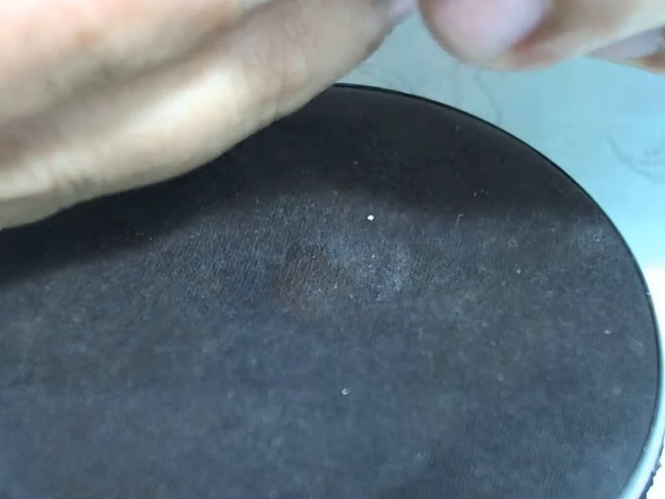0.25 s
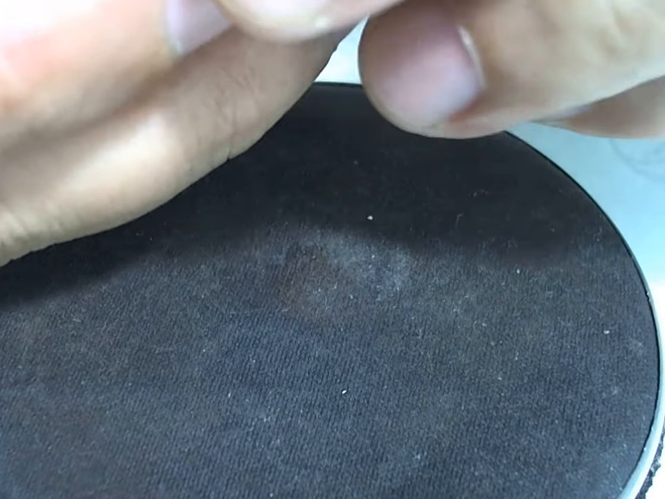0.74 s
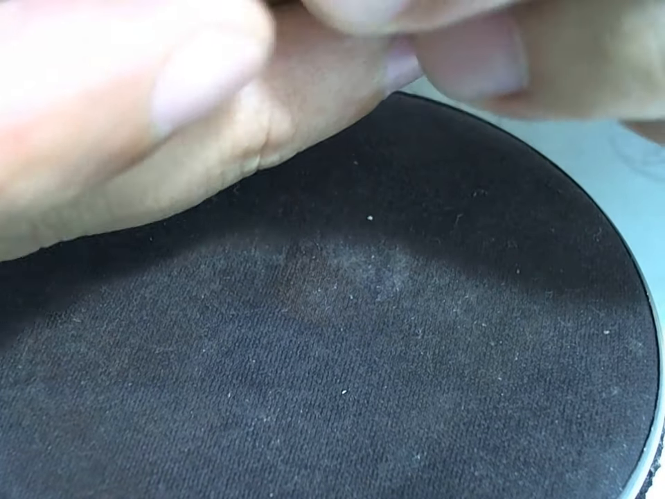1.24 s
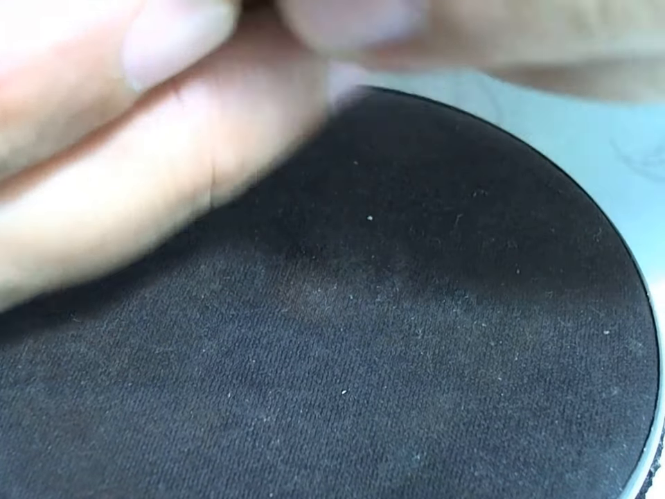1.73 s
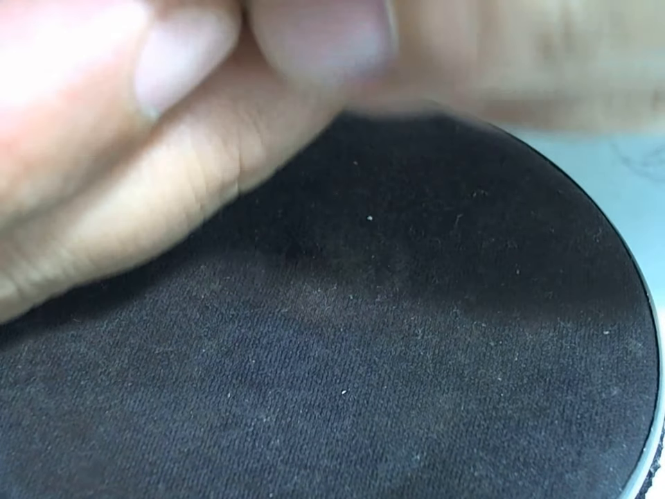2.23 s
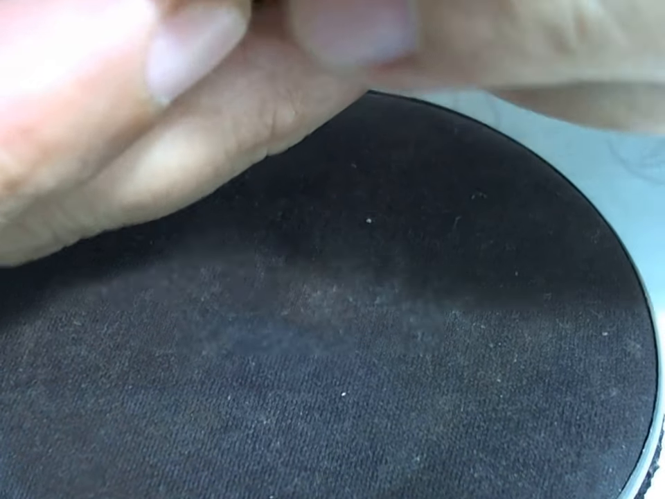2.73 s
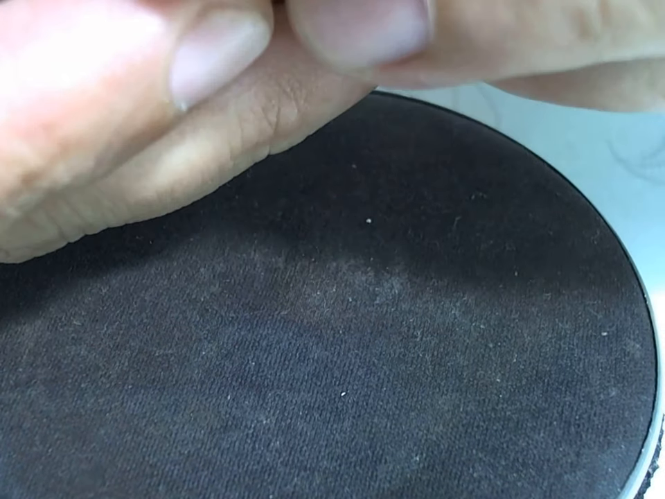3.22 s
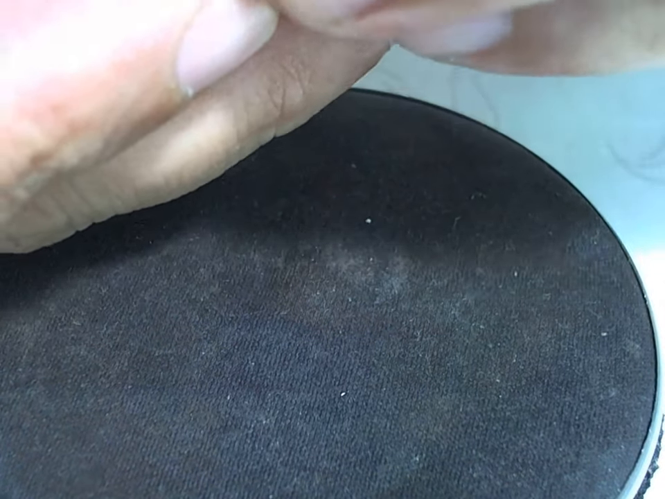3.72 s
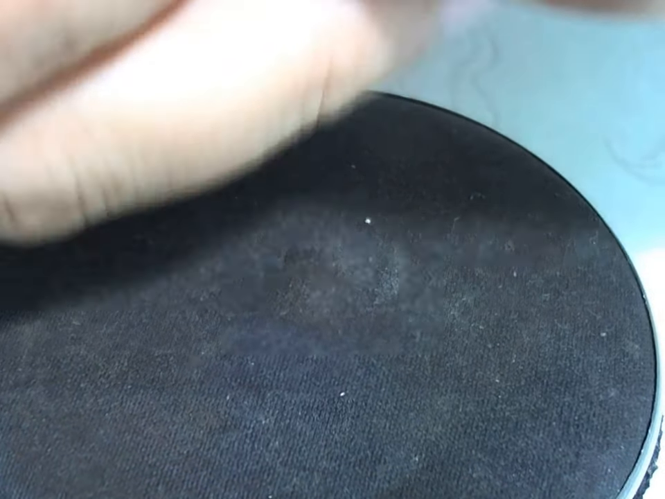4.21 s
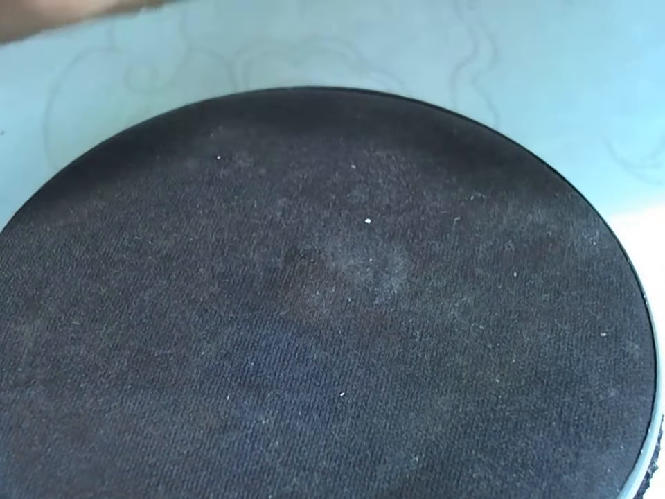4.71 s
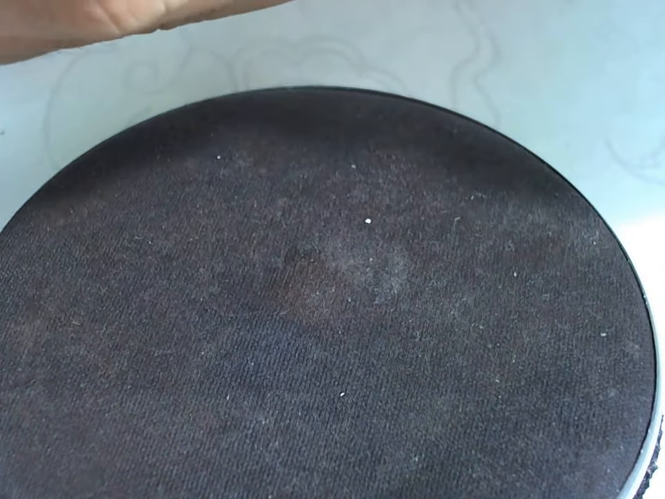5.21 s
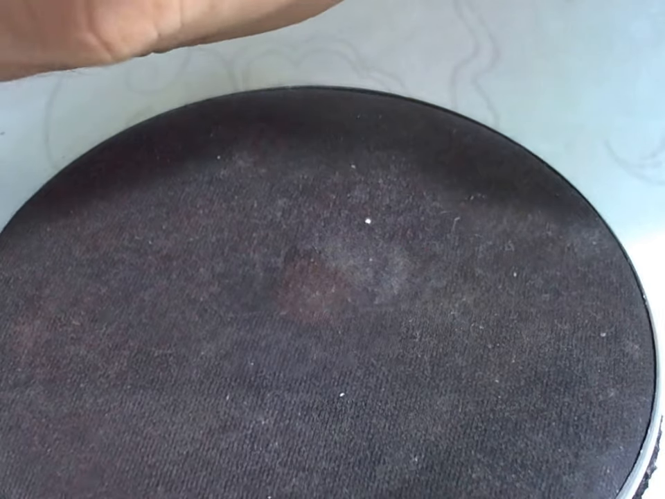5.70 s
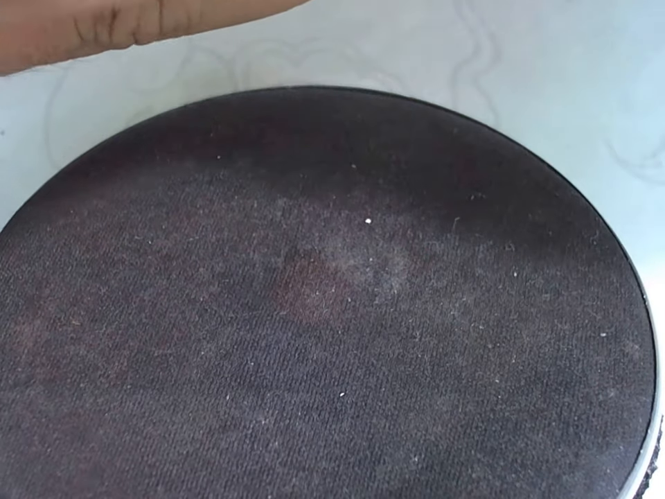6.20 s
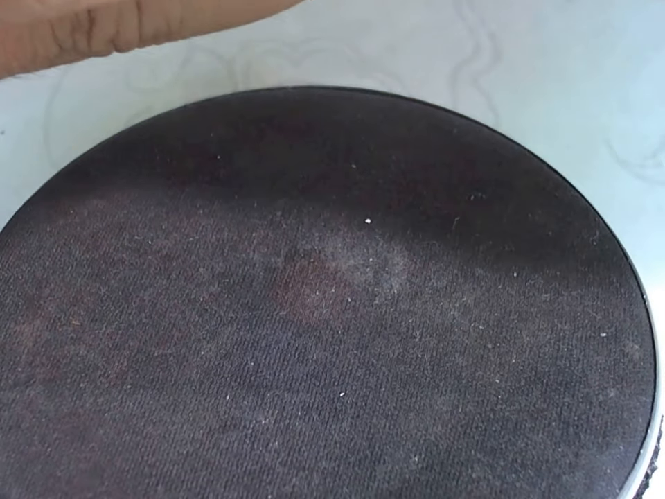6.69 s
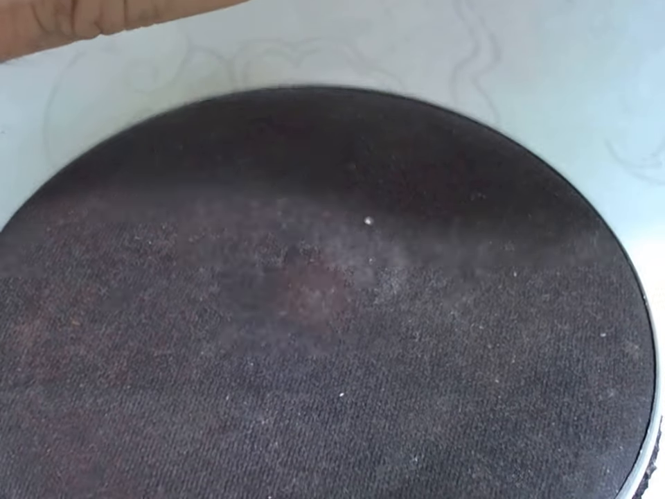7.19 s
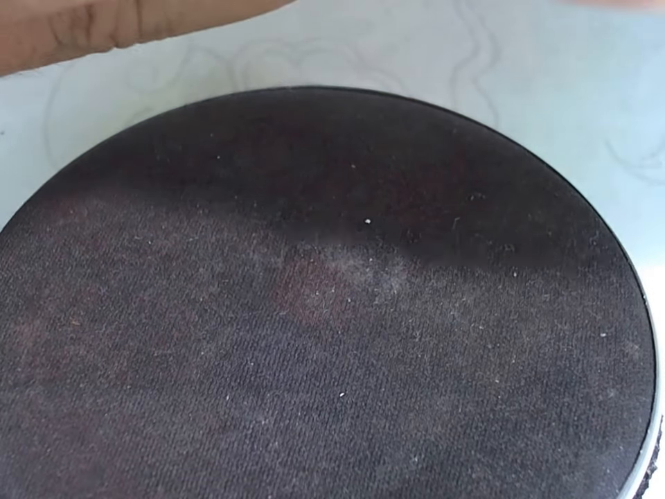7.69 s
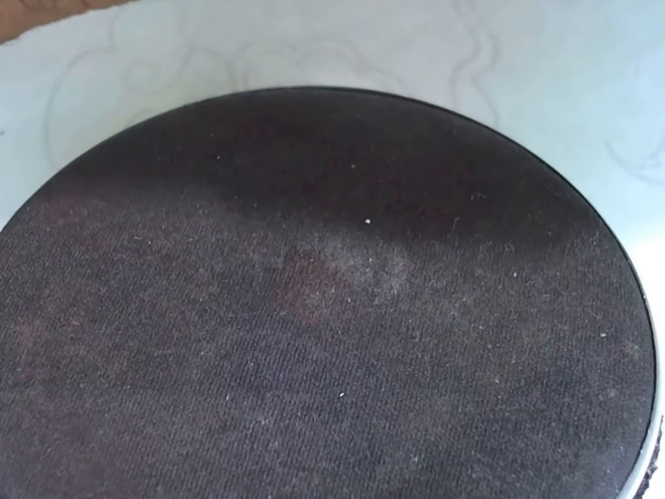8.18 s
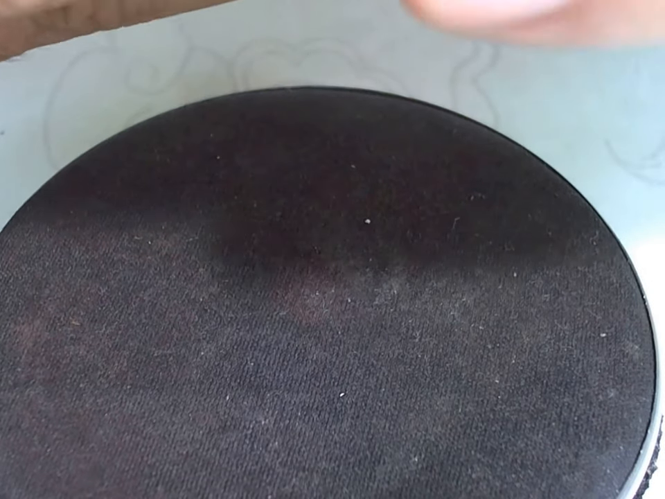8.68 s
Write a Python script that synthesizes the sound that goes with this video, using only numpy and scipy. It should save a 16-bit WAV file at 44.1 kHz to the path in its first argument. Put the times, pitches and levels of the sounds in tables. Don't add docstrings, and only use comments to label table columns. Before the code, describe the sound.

Fingertips and nails tap and click in quick irregular bursts on a small hollow object over a cloth pad, with faint hum and hiss.

```python
import sys
import numpy as np
from scipy import signal
from scipy.fft import rfft, irfft
from scipy.io import wavfile
from scipy.ndimage import uniform_filter1d

SR = 44100
rng = np.random.default_rng(int(sys.argv[2]) if len(sys.argv) > 2 else 0)


def linear_from_db(decibels):
    return 10 ** (np.asarray(decibels, float) / 20)


def put_to_file(sound):
    columns = np.atleast_2d(sound).T
    safe = np.clip(columns, -1, 1)
    whole_steps = np.round(safe * 32767)
    wavfile.write(sys.argv[1], SR, whole_steps.astype(np.int16))


N = 394694
GRAIN = 8192
HOP, HOP_START = 512, 288
CAMERA_SR, CAMERA_TOP_HZ = 32000, 9950

# [f/Hz, density level/dB]
FAN_HISS = [(30, -70), (60, -43), (110, -9), (220, -9.5), (400, -8), (1150, -11), (1500, -14.5),
            (2700, -12), (3350, -20), (4700, -17.5), (5700, -26), (7500, -31), (8400, -31), (10000, -32.5)]
# [f/Hz, level/dB, t60/s]
BENCH_MODES = [(114, -25, 1), (203.9, -5, 0.88), (237.5, 2.5, 0.51), (325, -11.5, 1)]
# [t/s, peak level/dB, width/s]
HUM_SWELLS = [(.04, -63, 0.02), (.43, -66, 0.034), (1.5, -51, 0.058), (1.84, -71, 0.074),
              (2.539, -51, 0.022), (3.109, -53, 0.037), (3.44, -50, 0.051), (4.049, -58.5, 0.033),
              (4.79, -58.5, 0.025), (5.041, -60, 0.023), (5.18, -50, 0.015), (5.6, -60, 0.093),
              (6.38, -53, 0.086), (6.92, -57.5, 0.05), (7.4, -59.5, 0.031), (8.073, -40.5, 0.041),
              (8.4, -66.5, 0.014), (8.85, -52.5, 0.025)]
# [t/s, knock peak level/dB, spot f/Hz, contact/ms]
PAD_TAPS = [(.005, -41.5, 1410, 10.3), (.072, -29, 1080, 10), (0.153, -34, 955, 9.6),
            (0.083, -29.5, 1030, 6.3), (0.237, -34, 973, 6.4), (.275, -27, 974, 9.2),
            (.280, -30, 1010, 5.3), (0.295, -34.5, 1023, 8.7), (.431, -47, 717, 7.4),
            (0.52, -35, 894, 13.4), (1.964, -32, 1202, 7.8), (2.078, -27, 1232, 4.2),
            (2.642, -36, 1100, 10.5), (3.002, -37.5, 1232, 6.1), (3.505, -25, 1027, 16.1),
            (3.796, -33, 934, 7.3), (3.904, -32, 934, 6.5), (4.948, -26, 968, 9.8),
            (4.977, -29, 1205, 12.7), (5.562, -34, 950, 11.4), (6.133, -43, 970, 10.3),
            (6.313, -31.5, 943, 13), (5.835, -35, 928, 9.9), (6.598, -20.5, 1041, 11.5),
            (6.630, -19.5, 1003, 7.2), (7.403, -28, 1166, 9.2), (7.413, -35, 1173, 12.7),
            (7.707, -40.5, 932, 14), (7.786, -28.5, 707, 9.6), (7.818, -37.5, 725, 18.4),
            (7.896, -26, 993, 16.5), (8.192, -38, 1022, 11.6), (8.753, -45.5, 1300, 14.4)]
# [t/s, knock peak level/dB, spot f/Hz, contact/ms]
NAIL_GRAZES = [(0.098, -26, 1153, 3.65), (.243, -25.5, 932, 3.26), (.259, -30.5, 993, 14.5),
               (1.933, -21.5, 1144, 6.1), (2.139, -25, 770, 11.8), (2.179, -22, 1041, 12.8),
               (2.571, -42.5, 1550, 7.3), (2.626, -32, 790, 7), (5.355, -15.5, 1137, 3.9),
               (5.360, -19, 1149, 6), (5.397, -37.5, 770, 10.3), (5.793, -27, 1200, 8.7),
               (6.216, -24, 1100, 7.8), (6.956, -16.5, 1068, 6.5), (7.278, -17, 1128, 3.2),
               (7.338, -21, 868, 8), (7.366, -21, 1252, 16.4), (7.609, -23.5, 972, 22),
               (7.931, -19.5, 1022, 9.7), (7.964, -20.5, 996, 9.2), (8.855, -28.5, 1182, 12.4)]
# [t/s, knock peak level/dB, spot f/Hz, contact/ms, click peak level/dB]
NAIL_FLICKS = [(0.102, -24, 964, 5.1, -26), (0.111, -27, 1200, 3.9, -54), (.784, -20.5, 899.5, 5.2, -31.5),
               (1.704, -40, 802, 6.9, -41.5), (2.198, -27.5, 1073, 7, -41),
               (2.583, -30.5, 1730, 4.3, -35.5), (2.594, -35, 1647, 10, -38), (2.603, -36.5, 1104, 36, -37),
               (2.704, -21.5, 1050, 8.1, -28), (2.717, -23.5, 582, 7.4, -34.5),
               (2.734, -34, 860, 23, -36.5), (2.762, -30, 1176, 1.6, -36), (2.773, -23, 1484, 6, -24.5),
               (2.806, -34.5, 900, 15.6, -40.5), (2.827, -40, 784, 3.2, -48), (3.290, -16.5, 942, 5, -23),
               (3.295, -13, 940, 6.76, -21.5), (3.301, -15.5, 1120, 4.7, -23),
               (3.313, -16.5, 1124, 9, -26.5), (4.517, -21, 1273, 13, -24), (4.532, -18.5, 1390, 8.9, -26),
               (4.57, -44, 1420, 7.2, -33.5), (5.347, -11, 991, 4.8, -21.5), (5.35, -11, 1006, 4, -19.5),
               (5.843, -22.5, 1038, 12.6, -31), (8.245, -31.5, 1164, 9, -36), (8.311, -25, 1065, 10.5, -39),
               (8.504, -38, 1504, 14.7, -35), (8.557, -33, 1146, 30, -34)]
# [t/s, knock peak level/dB, spot f/Hz, contact/ms, click peak level/dB]
NAIL_STRIKES = [(0.285, -21.5, 993, 6.3, -33), (.369, -21, 994, 4.7, -36.5), (.372, -17, 1045, 4.3, -27.5),
                (.377, -21, 1013, 8.7, -50), (.926, -18.5, 977, 3.4, -20.5),
                (1.194, -21.5, 950, 5.7, -28.5), (1.199, -13.5, 1001, 6.76, -22),
                (1.209, -18.5, 1163, 13.1, -27.5), (2.227, -21.5, 1198, 11.8, -31.5),
                (2.286, -17.5, 1120, 6, -27), (2.33, -19, 1238, 14.7, -24),
                (4.493, -20.5, 1002, 3.8, -33.5), (4.496, -21, 1184, 10.3, -32.5),
                (5.613, -13.5, 845, 12, -21.5), (5.797, -22.5, 1250, 5.1, -32.5),
                (6.171, -27.5, 1106, 6.3, -31), (6.178, -11, 1140, 9.8, -20),
                (6.640, -16.5, 1005, 8.9, -24), (6.645, -16.5, 1138, 7.9, -29),
                (6.669, -15.5, 1013, 5.7, -34.5), (6.943, -16, 862, 9.5, -29),
                (6.985, -15, 1050, 1.8, -15.5), (6.998, -11.5, 1078, 7.7, -23),
                (7.305, -27, 936, 14.4, -34), (7.753, -21.5, 885, 5.5, -36), (8, -28, 1132, 10, -37),
                (8.257, -26, 944, 7.7, -37), (8.782, -36, 1555, 23, -37), (8.79, -31.5, 1460, 37, -29.5),
                (8.821, -22, 1214, 12.3, -24)]
# [t/s, knock peak level/dB, spot f/Hz, contact/ms]
SKIN_SLIPS = [(0.966, -38, 895, 37), (1.015, -38, 926, 30.7), (1.053, -51.5, 985, 11),
              (1.752, -43, 1220, 5), (3.454, -37.5, 1014, 3.7), (5.889, -43.5, 1200, 17),
              (7.038, -43.5, 990, 23), (7.05, -37.5, 1250, 17), (7.239, -32, 1190, 5.4),
              (7.323, -48, 946, 8.2), (7.512, -30.5, 1162, 6.4), (7.59, -41.5, 1120, 6.2),
              (7.636, -31, 1260, 10), (7.653, -29, 1228, 11.7), (7.693, -40, 1064, 8.3),
              (8.221, -35.5, 907, 5.6), (8.474, -42, 1604, 28), (8.53, -33.5, 1470, 9),
              (8.763, -37.5, 1300, 3.9)]
# [f/Hz, level/dB, t60/s]
SHELL_MODES = [(540.6, -9.5, 0.064), (650.5, -11.5, 0.087), (770, -3, 0.043), (838.5, 0.5, 0.022),
               (955.6, 1.5, .03), (1050, 1, 0.021), (1135, -1.5, 0.028), (1226, 2, .04), (1300, -2, 0.037),
               (1439, -7.5, 0.028), (1564, -8.5, 0.043), (1727, -6.5, .06)]
# [f/Hz, level/dB, t60/s]
NAIL_MODES = [(1987, -9, 0.0091), (2650, -5.5, 0.054), (2953, -5.5, 0.013), (3427, -6.5, 0.013),
              (3860, -5.5, 0.016), (4242, 0.5, 0.018), (4344, -1.5, 0.019), (4692, 0, .02),
              (5076, -6, .012), (5380, -6, 0.013), (6255, -9.5, 0.011), (6785, -14, 0.018)]
# [f/Hz, level/dB, t60/s]
RIM_MODES = [(7690, -8.5, 0.0053), (8320, -3.5, 0.021), (8370, 1, 0.06), (9000, -6, 0.017),
             (9550, -12.5, 0.01)]
# [t/s, peak level/dB]
WRIST_THUMPS = [(0.033, -44), (1.248, -41), (1.304, -41), (1.431, -47), (1.485, -41.5), (2.462, -43),
                (2.546, -45.5), (2.947, -40), (3.016, -38), (3.171, -41), (3.389, -46), (3.44, -36.5),
                (3.545, -34), (3.63, -38.5), (3.707, -41.5), (3.977, -42), (4.478, -44), (5.183, -43.5),
                (6.346, -48), (7.146, -43.5), (7.225, -39.5), (7.795, -38), (7.845, -40), (7.989, -37.5),
                (8.038, -31.5), (8.095, -36), (8.597, -39), (8.683, -42), (8.775, -48.5), (8.85, -53)]
# [t/s, tick peak level/dB]
WATCH_LEVELS = [(0, -44), (.5, -47), (.7, -61), (1.0, -48), (1.5, -45), (1.7, -46.5), (2.9, -53),
                (3.8, -29), (4.6, -63), (5.7, -77), (6.6, -48), (8.95, -59)]
# [t/s, peak level/dB, ring f/Hz, ping against snap level/dB]
NAIL_SNAPS = [(0.1069, -19.5, 4260, -10.5), (0.2861, -34, 2650, 5), (0.3693, -43.5, 2650, 16.5),
              (0.3705, -36, 4340, -8), (.381, -33, 2650, -13.5), (0.7864, -28, 4560, -9.5),
              (0.9283, -18, 4340, -4), (1.1941, -27, 4500, -13), (1.2029, -16.5, 4540, -6.5),
              (1.207, -23.5, 4410, -6.5), (1.7052, -33, 3970, -15), (2.2285, -29, 5300, 2),
              (2.287, -19.5, 5400, -8.5), (2.33, -32, 4520, 1), (2.5809, -34.5, 4500, -17.5),
              (2.6078, -27.5, 4350, -13.5), (2.7071, -32, 3850, -17), (2.718, -22, 4320, -15),
              (2.732, -32.5, 4130, -19), (2.7652, -20.5, 4370, -17), (2.774, -24.5, 4450, -12),
              (2.826, -33.5, 4460, -24.5), (3.2893, -29.5, 4350, -2), (3.2925, -25.5, 2650, -5),
              (3.2996, -20.5, 4200, -10.5), (3.3125, -15.5, 3840, -19.5), (4.496, -41, 4450, -5),
              (4.5171, -28, 4750, -20), (4.522, -24, 4600, -8.5), (4.5325, -21.5, 4740, -36),
              (5.3475, -23, 4710, -7), (5.3527, -17.5, 4560, -14), (5.6094, -27.5, 2650, -3),
              (5.613, -25, 4240, -16), (5.8, -47, 4400, 4), (5.846, -36, 4400, -8.5),
              (6.1713, -32.5, 4470, -4.5), (6.18, -19.5, 4487, -2), (6.642, -34.5, 4350, -2.5),
              (6.6435, -34.5, 4300, -5), (6.6676, -35, 4210, -7), (6.944, -21, 4330, -11),
              (6.985, -35.5, 4230, -4), (7.0002, -27.5, 4360, -8.5), (7.307, -51, 4300, -6.5),
              (7.9995, -37.5, 4480, -9), (8.31, -37, 6360, -13.5), (8.782, -39, 5540, 5),
              (8.823, -29.5, 2680, 1)]
# [start t/s, length/s, level/dB]
CLOTH_BRUSHES = [(0.808, 0.15, -65), (2.12, 0.093, -57.5), (2.567, 0.15, -53), (2.696, 0.2, -52.5),
                 (6.62, 0.17, -54), (6.817, 0.35, -66.5), (4.477, 0.078, -48), (5.827, .14, -49),
                 (7.254, 0.14, -63), (7.362, 0.75, -64), (8.418, 0.28, -61.5)]
# [f/Hz, density level/dB]
CLOTH_HISS = [(1500, -19.5), (4500, 2.5), (7200, -17), (8400, 1), (9800, -8.5)]
# [t/s, peak level/dB, f/Hz]
BENCH_BUMPS = [(2.59, -34, 457), (2.714, -30, 492), (5.186, -50, 272), (5.596, -29.5, 372),
               (7.234, -61, 272), (7.795, -27, 297), (7.818, -32.5, 316), (7.842, -31.5, 308),
               (8.605, -47, 260), (8.688, -57, 276), (8.815, -30, 477)]
# [f/Hz, level/dB]
CAMERA_STEP = [(100, -4.5), (1000, -3), (3000, 4), (5500, 4.5), (7000, 4.5), (10000, 2.5)]


def along(table, hz):
    f, db = np.transpose(table)
    return linear_from_db(np.interp(np.log(hz + 1), np.log(f), db))


def bin_hz():
    return np.arange(N // 2 + 1) * SR / N


def band(low_hz, high_hz, size=GRAIN):
    sos = signal.butter(4, [low_hz, high_hz], "band", fs=SR, output="sos")
    return signal.sosfreqz(sos, np.arange(size // 2 + 1) * SR / size, fs=SR)[1]


def ringing(modes, size):
    hz, db, t60 = np.transpose(modes)[:, :, None]
    t = np.arange(min(size, SR)) / SR
    return rfft(linear_from_db(db) * np.sin(2 * np.pi * hz * t) * 1000. ** (-t / t60), size)


def rattle(press_s, grit_db):
    u = np.arange(GRAIN) / SR / np.maximum(press_s, .0004)[:, None]
    white = rng.standard_normal(u.shape)
    grit = linear_from_db(grit_db * rng.exponential(size=u.shape))
    return rfft(white * grit * (u * np.exp(1 - u)) ** 5)


def place(grains, s, db):
    out = np.zeros(N + 2 * GRAIN)
    power = uniform_filter1d(np.abs(signal.hilbert(grains)) ** 2, size=90)
    for grain, p, at, gain in zip(grains, power, s, linear_from_db(db)):
        start = GRAIN + int(at * SR) - np.argmax(p)
        out[start:start + GRAIN] += grain * gain / np.sqrt(p.max())
    return out[GRAIN:GRAIN + N]


def fan():
    hiss = irfft(rfft(rng.standard_normal(N)) * along(FAN_HISS, bin_hz()), N)
    return hiss / hiss.std() * linear_from_db(-58.5)


def hum():
    level_db, lump_db, lumps_per_s = -61.5, 4.5, 16
    t = np.arange(N) / SR
    drone = irfft(rfft(rng.standard_normal(N)) * ringing(BENCH_MODES, N).sum(axis=0), N)
    steady = drone / np.sqrt(uniform_filter1d(drone ** 2, size=5000))
    lump = int(SR / lumps_per_s)
    lumps = uniform_filter1d(np.repeat(rng.standard_normal(200), lump)[:N], lump)
    swells = sum(linear_from_db(db) * np.exp(-((t - s) / width) ** 2 / 2) for s, db, width in HUM_SWELLS)
    judder = irfft(rfft(steady * swells) * band(150, 290, N), N)
    return steady * linear_from_db(level_db + lump_db * lumps) + judder


def contacts():
    rows = []
    for touches, ping_db in [(NAIL_STRIKES, -0.5), (NAIL_FLICKS, -14.5)]:
        rows += [(s, db, hz, ms, click + ping_db, click) for s, db, hz, ms, click in touches]
    rebounds = [(s + 0.016, db - 14.5, hz, ms) for s, db, hz, ms in PAD_TAPS]
    for touches, ping_db, click_db in [(NAIL_GRAZES, -23, -18.5), (PAD_TAPS + rebounds, -34.5, -25.5)]:
        rows += [(s, db, hz, ms, db + ping_db, db + click_db) for s, db, hz, ms in touches]
    rows += [(s, db, hz, ms, -48 + 0.11 * (db + 38), db - 29) for s, db, hz, ms in SKIN_SLIPS]
    return rows


def taps():
    s, knock_db, hz, ms, ping_db, click_db = np.transpose(contacts())
    s = s + 0.00078
    shells, nails, rims = len(SHELL_MODES), len(NAIL_MODES), len(RIM_MODES)
    scatter = rng.standard_normal((len(s), shells + nails + rims))

    near_db = -(np.log2(np.array(SHELL_MODES)[:, 0] / hz[:, None]) / 0.095) ** 2
    sign = np.sign(rng.standard_normal(near_db.shape))
    woken_db = np.maximum(near_db, -6 + 0.55 * knock_db[:, None])
    share = sign * linear_from_db(woken_db + 2.6 * scatter[:, :shells])
    thud = linear_from_db(33 + 0.7 * knock_db[:, None])
    shell = (share @ ringing(SHELL_MODES, GRAIN) + thud) * band(560, 1650)
    knock = irfft(rattle(.00058 * (ms - 2.5), 1.5) * shell)

    crack = rattle(.0006 * (ms - 1.5), 4.9)
    nail_share = linear_from_db(3.9 * scatter[:, shells:-rims])
    crackle = linear_from_db(21) * band(3500, 5700)
    nail = (nail_share @ ringing(NAIL_MODES, GRAIN) + crackle) * band(2000, 7200)
    bins = np.arange(nail.shape[1]) * (1 + 0.033 * rng.standard_normal((len(s), 1)))
    nail = np.take_along_axis(nail, np.minimum(bins.astype(int), GRAIN // 2), axis=1)
    click = irfft(crack * nail)

    rim = linear_from_db(2.2 * scatter[:, -rims:]) @ ringing(RIM_MODES, GRAIN)
    ping = irfft(crack * rim * band(7000, 10500))

    out = place(knock, s, knock_db) + place(click, s, click_db - 7) + place(ping, s, ping_db - 7)
    slide = rattle(0.013 + 0 * s, 2.9)
    out += place(irfft(slide * shell), s + .019, knock_db - 24.0)
    out += place(irfft(slide * nail), s + .004, click_db - 13.0)
    out += place(irfft(slide * band(7700, 9300)), s + .005, ping_db - 19.5)
    return out


def wrists():
    s, db = np.transpose(WRIST_THUMPS)
    modes = [(hz, 0, .09) for hz, *_ in BENCH_MODES[1:3]]
    note = ringing(modes, GRAIN).sum(axis=0) * band(180, 280)
    return place(irfft(rattle(0.0033 + 0 * s, 1.6) * note), s + .008, db - 2.5)


def watch():
    s = .052 + .2003 * np.arange(45)
    db = np.interp(s, *np.transpose(WATCH_LEVELS)) + 1.3 * rng.standard_normal(len(s))
    return place(irfft(rattle(0.016 + 0 * s, 1.6) * band(12000, 17000)), s, db)


def snaps():
    snap_s, crack_db, spread_octaves = .0012, 21.5, 0.1
    s, db, hz, ping_db = np.transpose(NAIL_SNAPS)
    near_db = -(np.log2(np.array(NAIL_MODES)[:, 0] / hz[:, None]) / spread_octaves) ** 2
    crack = rattle(snap_s + 0 * s, 3.0)
    unpitched = linear_from_db(crack_db) * band(3400, 5800)
    nail = (linear_from_db(np.maximum(near_db, -14)) @ ringing(NAIL_MODES, GRAIN) + unpitched) * band(2200, 7000)
    tone = linear_from_db(ping_db[:, None]) * ringing(RIM_MODES, GRAIN).sum(axis=0)
    rim = (tone + linear_from_db(crack_db - 3.5)) * band(7500, 10500)
    return place(irfft(crack * nail), s, db) + place(irfft(crack * rim), s, db + ping_db)


def brushing():
    fade_in_s, fade_out_s = 0.017, 0.11
    grit = rng.standard_normal(N) * linear_from_db(4.9 * rng.exponential(size=N))
    hiss = irfft(rfft(grit) * along(CLOTH_HISS, bin_hz()) * band(1400, 10500, N), N)
    t = np.arange(N) / SR
    strokes = np.zeros(N)
    for s, length, db in CLOTH_BRUSHES:
        ramp = np.minimum((t - s) / fade_in_s, (s + length - t) / fade_out_s)
        strokes += linear_from_db(db) * np.clip(ramp, 0, 1) ** 2
    return hiss / hiss.std() * strokes


def bumps():
    s, db, hz = np.transpose(BENCH_BUMPS)
    notes = ringing([(f, 0, .07) for f in hz], GRAIN) * band(230, 600)
    return place(irfft(rattle(0.0055 + 0 * s, 4.2) * notes), s + 0.0033, db - 5.5)


def room(x, t60, db):
    t = np.arange(SR // 2) / SR
    tail = rng.standard_normal(len(t)) * 1000. ** (-t / t60) * (1 - np.exp(-t / 0.0082))
    tail *= linear_from_db(db) / np.sqrt(np.sum(tail ** 2))
    return x + signal.fftconvolve(x, tail)[:N]


def scene():
    near_sounds = taps() + snaps() + bumps() + wrists() + watch()
    return (room(near_sounds, 0.12, -17.0) + brushing() + hum() + fan())[None]


def packed(x, quiet_db, follow, patchy_db):
    n, k = np.arange(2 * HOP), np.arange(int(CAMERA_TOP_HZ / CAMERA_SR * 2 * HOP))
    window = np.sqrt(2 / HOP) * np.sin(np.pi * (n + .5) / (2 * HOP))[:, None]
    basis = window * np.cos(np.pi / HOP * np.outer(n + .5 + HOP / 2, k + .5))
    lead = 2 * HOP - HOP_START
    halves = np.pad(x, (lead, HOP - (len(x) - HOP_START) % HOP + HOP)).reshape(-1, HOP)
    lines = np.hstack([halves[:-1], halves[1:]]) @ basis
    nearby = uniform_filter1d(lines ** 2, size=len(k) // 11, axis=1)
    nearby = nearby + linear_from_db(-27.0) * np.mean(lines ** 2, axis=1)[:, None]
    over_db = np.maximum(10 * np.log10(nearby + 1e-12) - quiet_db - 3, 0)
    hz = (k + .5) * CAMERA_SR / 2 / HOP
    which = (14 * np.log2(1 + hz / 700)).astype(int)
    drift = rng.standard_normal((len(lines), which.max() + 1))
    patches = uniform_filter1d(drift, size=8, axis=0)[:, which] * np.sqrt(8)
    step = linear_from_db(quiet_db + follow * over_db + patchy_db * patches) * along(CAMERA_STEP, hz)
    whole = np.floor(np.abs(lines / step) ** .75 + .4054)
    blocks = (np.sign(lines) * whole ** (4 / 3) * step) @ basis.T
    joined = (blocks[:-1, HOP:] + blocks[1:, :HOP]).ravel()
    return joined[lead - HOP:][:len(x)]


def camera(x):
    treble = signal.sosfilt(signal.butter(4, 3000, "high", fs=SR, output="sos"), x)
    slow = signal.resample_poly(x, 320, 441)
    coarse = packed(slow, quiet_db=-58.5, follow=0.94, patchy_db=4.5)
    out = signal.resample_poly(coarse, 441, 320)[:N]
    span = HOP * SR // CAMERA_SR
    spill = linear_from_db(-35) * uniform_filter1d(treble ** 2, size=2 * span) ** .4
    out = out + np.maximum(spill, linear_from_db(-87)) * rng.standard_normal(N)
    return irfft(rfft(out) * (bin_hz() < 15800), N)


def top_cut(x):
    return signal.sosfilt(signal.butter(12, 16270, fs=SR, output="sos"), x)


def record(dry):
    thin = signal.sosfilt(signal.butter(5, 85, "high", fs=SR, output="sos"), dry[0])
    mix = camera(thin)[None]
    return top_cut(mix)


dry = scene()
out = record(dry)
put_to_file(out)
```